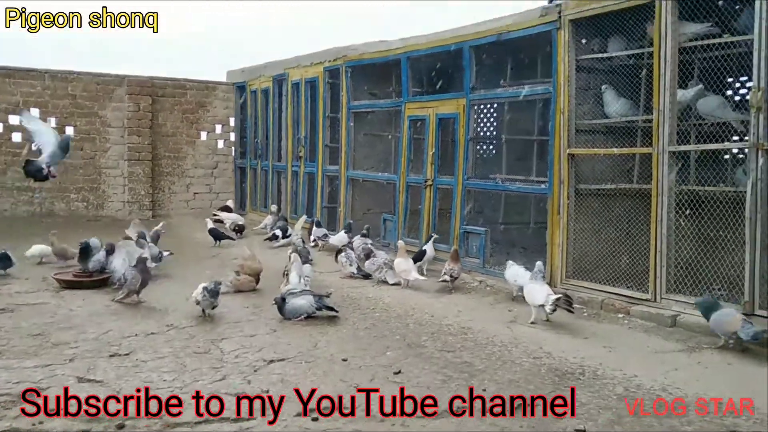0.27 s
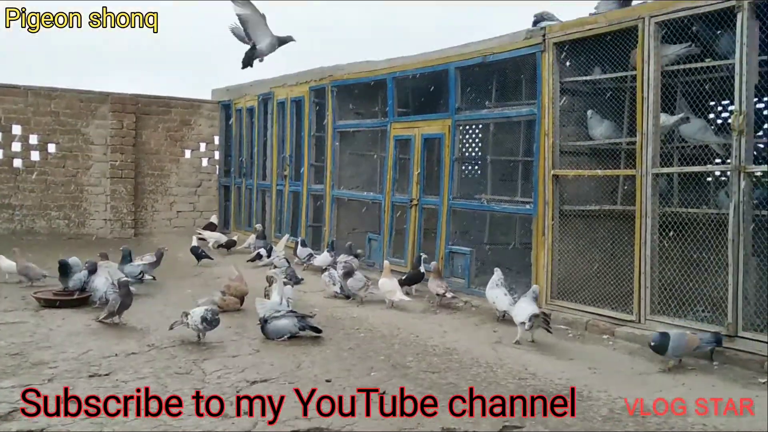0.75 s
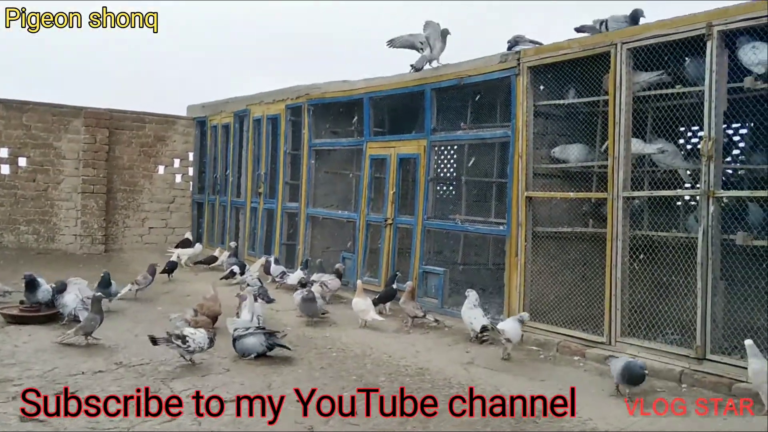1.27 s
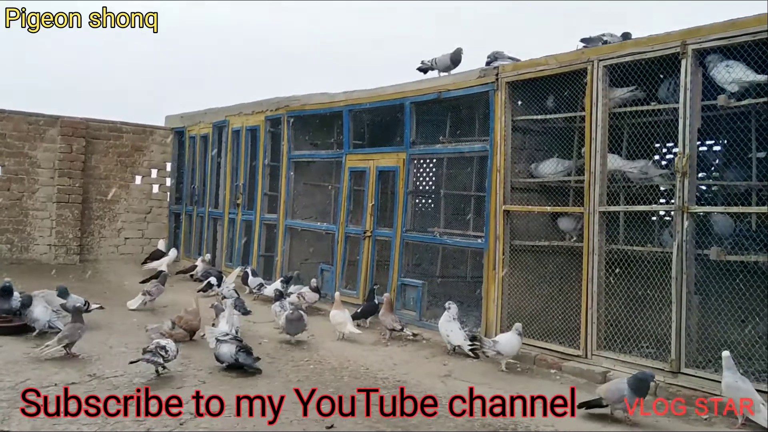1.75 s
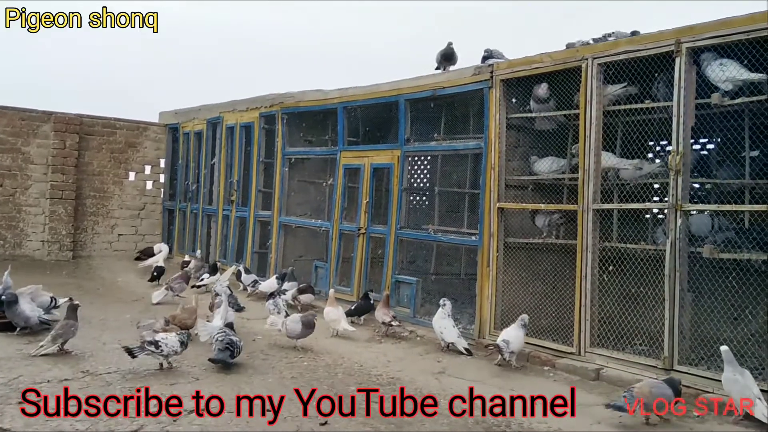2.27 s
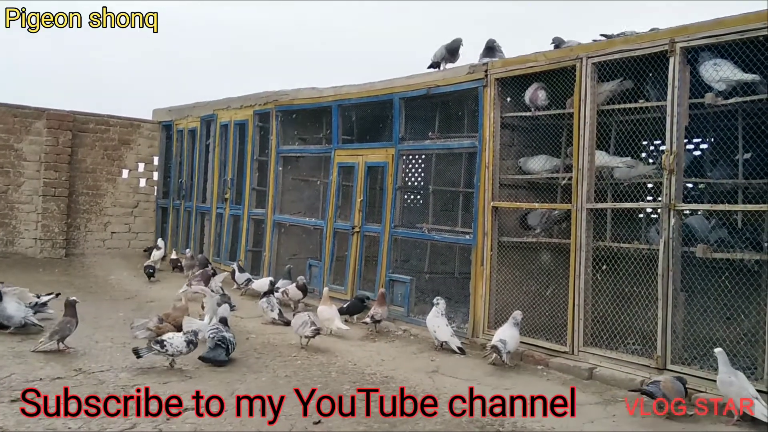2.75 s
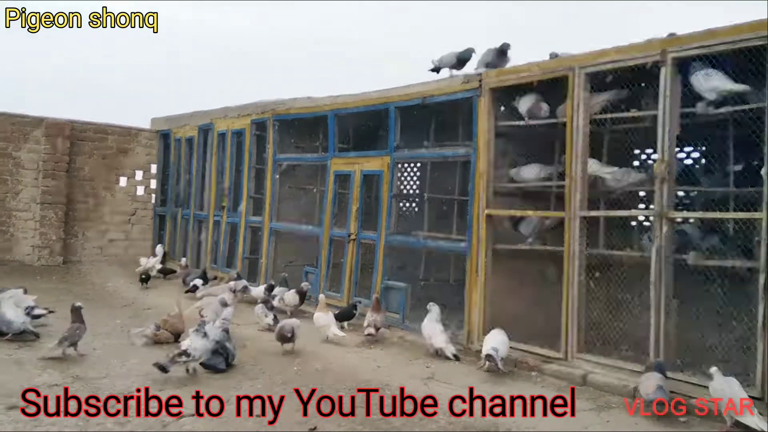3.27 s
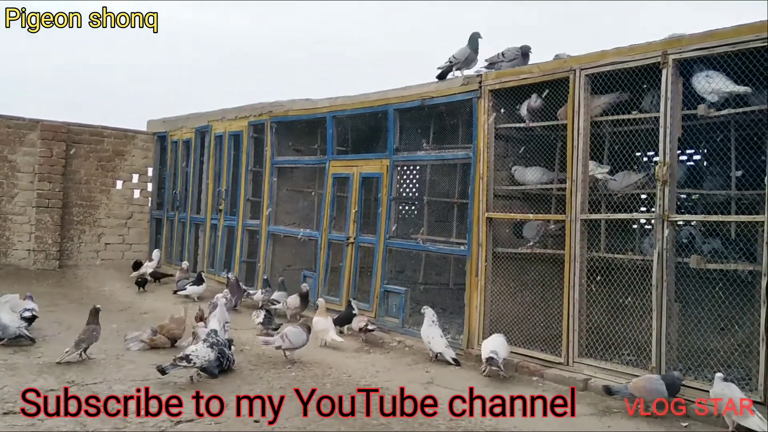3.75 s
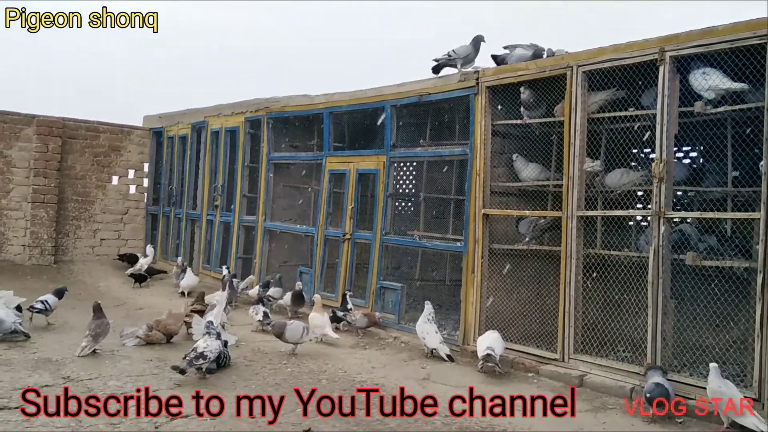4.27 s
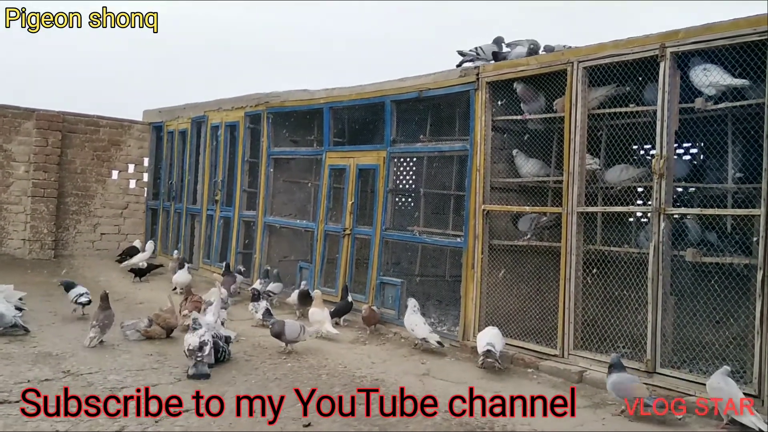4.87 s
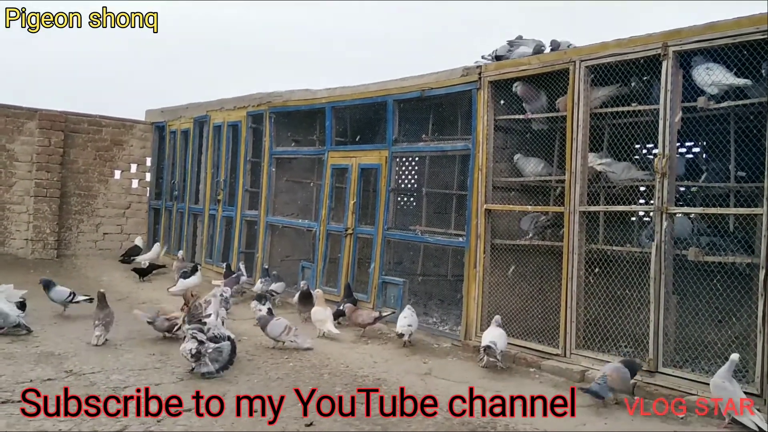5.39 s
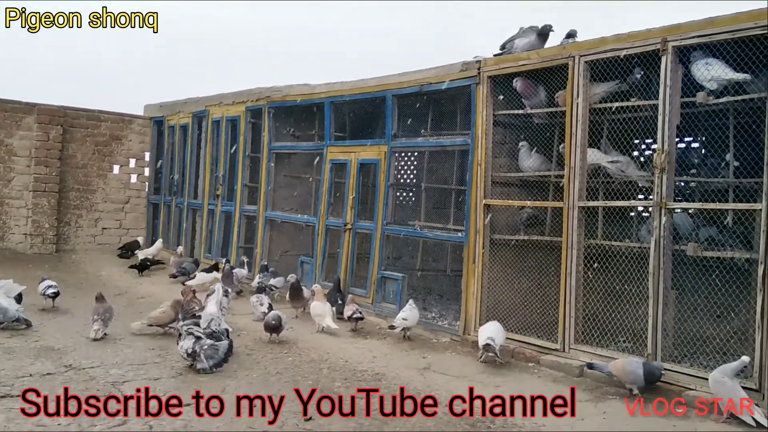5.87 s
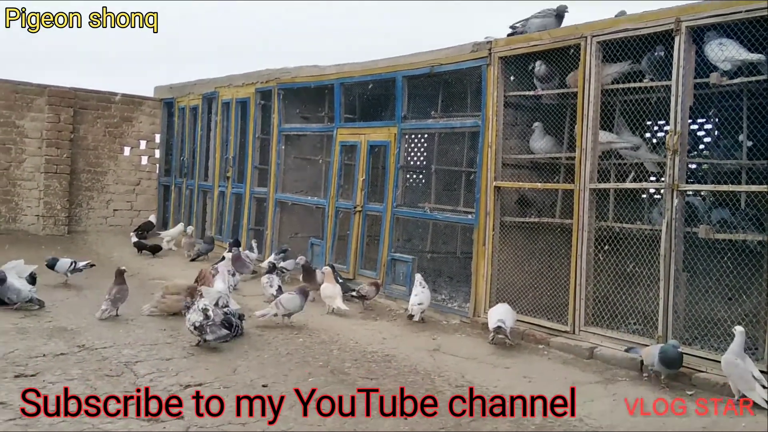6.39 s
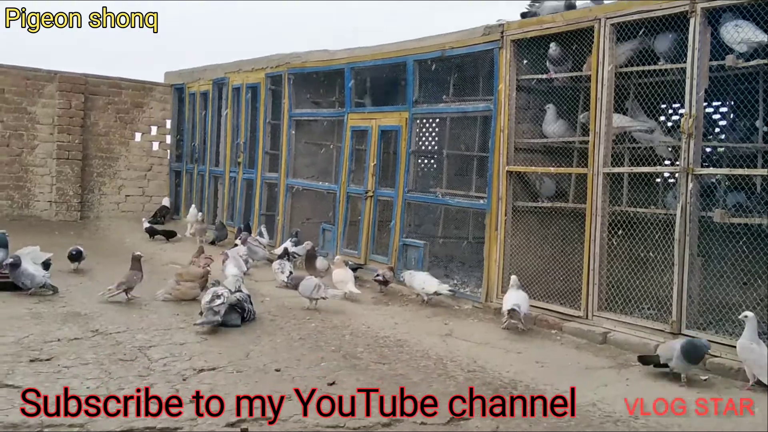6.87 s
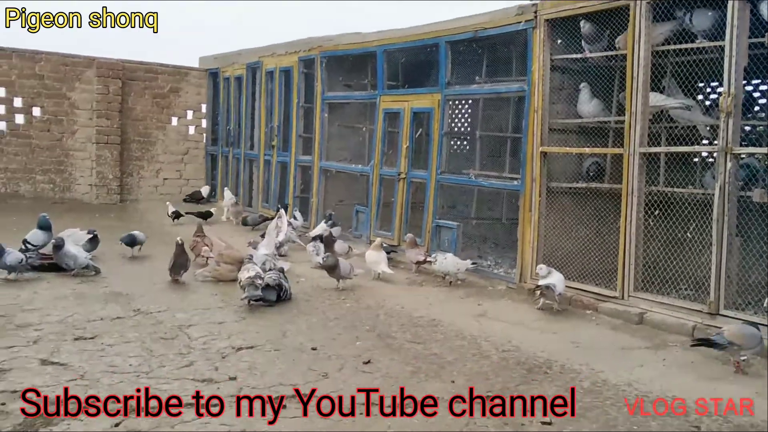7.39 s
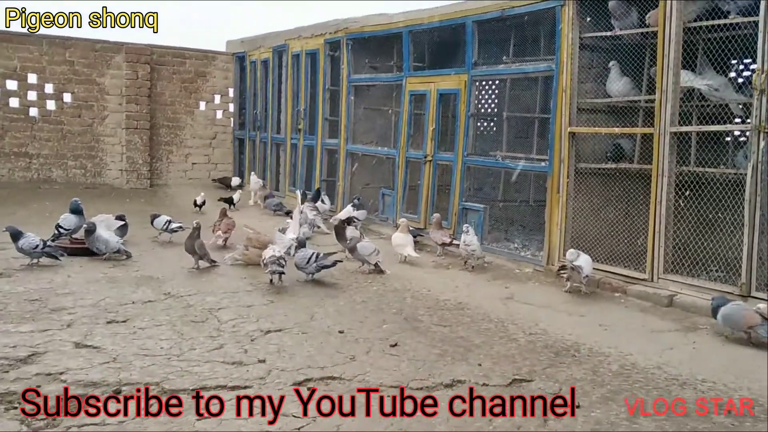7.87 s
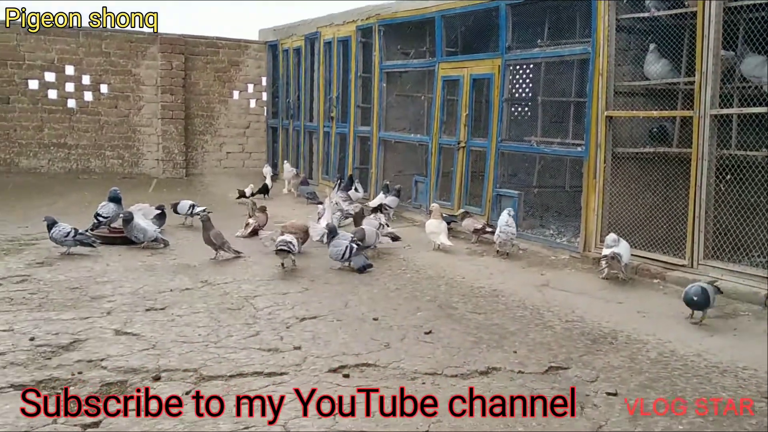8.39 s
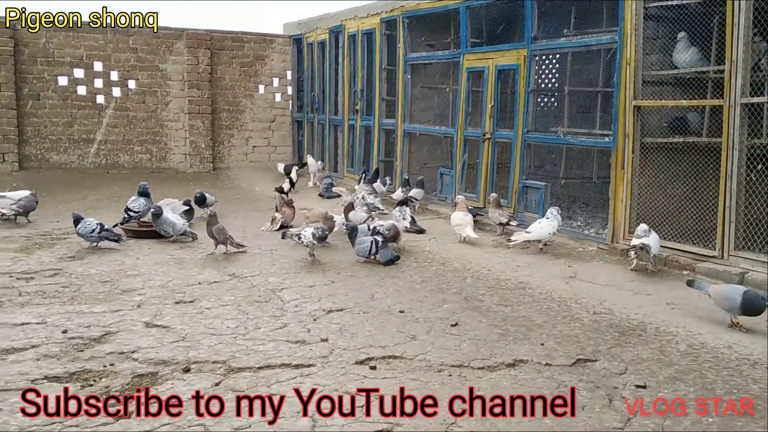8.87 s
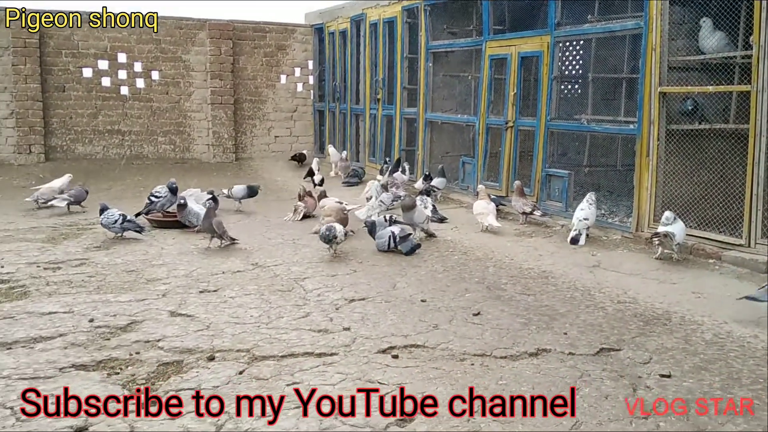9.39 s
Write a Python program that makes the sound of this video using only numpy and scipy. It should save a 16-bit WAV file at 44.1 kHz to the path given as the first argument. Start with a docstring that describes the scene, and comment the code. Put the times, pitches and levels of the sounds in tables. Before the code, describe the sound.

Dozens of pigeons murmur and roll low coos beside a wire-fronted loft, wings flapping now and then over thin hiss and light wind.

```python
"""A brick courtyard beside a pigeon loft, where a flock coos: overlapping syrinx tones rolled by flutter.
Near birds stand out of the chorus, with throbs and short high hoots; other notes are faint and distant.
Wings swish and clap in shaped noise, feathers rustle, beaks tick; the loft's wire front rattles once as modes.
Sparrows chirp far off, another bird cheeps, a thin trill wavers, and walls return sparse echoes.
A narrow hiss stays on the left, puffs of low wind noise hit the right microphone port, over outdoor air."""
import sys
import numpy as np
from scipy import signal
from scipy.fft import rfft, irfft, next_fast_len
from scipy.io import wavfile
from scipy.ndimage import uniform_filter1d

SR = 44100
rng = np.random.default_rng(int(sys.argv[2]) if len(sys.argv) > 2 else 0)


def generate_wav(signal):
    """Clip the signal to [-1, 1] and save it as 16-bit WAV at the path in sys.argv[1]."""
    frames = np.transpose(np.atleast_2d(signal))
    scaled = np.clip(frames, -1, 1) * 32767
    pcm = np.round(scaled).astype(np.int16)
    wavfile.write(sys.argv[1], SR, pcm)


N = 424683
TIME_S = np.arange(N) / SR
LAG_S = 0.00013  # left port after right


def gain_of(db):
    """Decibels to amplitude."""
    return 10 ** (np.asarray(db) / 20)


def evened(x):
    """Scales to rms 1."""
    return x / np.sqrt(np.mean(x ** 2) + 1e-20)


def read(points, hz):
    """A spectrum joined by straight lines over log frequency."""
    point_hz, value = np.transpose(points)
    return np.interp(np.log(hz + 1), np.log(point_hz + 1), value)


def level(rows):
    """A dB curve as a gain for every sample."""
    return gain_of(np.interp(TIME_S, *np.transpose(rows)))


def swells(rows, rise_s, fall_s):
    """Gain for every sample from events that rise, hold and fall; overlaps add in power."""
    power = np.zeros(N)
    for start_s, length_s, level_db in rows:
        rise = (TIME_S - start_s) / rise_s
        fall = (start_s + length_s - TIME_S) / fall_s
        power += (gain_of(level_db) * np.clip(np.minimum(rise, fall), 0, 1)) ** 2
    return np.sqrt(power)


def add(mix, start_s, sound):
    """Mixes a sound in at start_s, cut at the end of the mix."""
    part = mix[..., max(round(start_s * SR), 0):][..., :sound.shape[-1]]
    part += sound[..., :part.shape[-1]]


def coloured(x, colour, tilt_db=0):
    """Gives x a spectrum, tilted per octave, at rms 1."""
    size = next_fast_len(x.shape[-1])
    hz = np.fft.rfftfreq(size, 1 / SR)
    gain = gain_of(read(colour, hz) + tilt_db * np.log2(hz + 1))
    return evened(irfft(rfft(x, size) * gain, size)[..., :x.shape[-1]])


def wander(size, rate_hz):
    """Random drift of about unit size: straight lines between rate_hz random knots a second."""
    at = np.arange(size) * rate_hz / SR
    knots = rng.standard_normal(size // 100 + 4)
    return np.interp(at, np.arange(len(knots)), knots)


def noise():
    """White noise, independent at the two ports."""
    return rng.standard_normal((2, N))


def placed(x, left_db, lag_s=LAG_S):
    """Two ports: louder on the left by left_db, later on the left by lag_s."""
    at = np.arange(len(x))
    left = np.interp(at - lag_s * SR, at, x)
    return np.array([left * gain_of(left_db / 2), x * gain_of(-left_db / 2)])


# echo decay of the walls: frequency_hz, t60_s
WALL_DECAY = [(400,0.56),(10000,0.32)]


def yard(x, likeness):
    """Sparse wall echoes of random sign, each band dying at its own speed; likeness correlates the ports."""
    size, step = SR // 20, 20
    at = np.arange(size) * step + rng.integers(0, step, (2, size))
    taps = np.zeros((2, size * step))
    np.put_along_axis(taps, at, rng.choice([-1., 1.], (2, size)), 1)
    taps[:, :SR // 200] = 0  # no echo in the first 5 ms
    taps[1] = likeness * taps[0] + np.sqrt(1 - likeness ** 2) * taps[1]
    hz, t, bands = signal.stft(taps, SR, nperseg=256)
    decay = gain_of(-60 * t / read(WALL_DECAY, hz)[:, None])
    tail = signal.istft(bands * decay, SR)[1]
    return signal.fftconvolve(x, tail / np.linalg.norm(tail[0]), axes=1)[:, :N]


def syrinx(hz, rough, flutter_hz):
    """A nearly pure tone, pitch and strength rolled by an uneven flutter; returns strength and phase."""
    size = len(hz)
    flutter = np.cumsum(flutter_hz * (1 + 0.3045 * wander(size, 29.6))) / SR
    roll = np.sin(2 * np.pi * (flutter + rng.random()))
    shaken_hz = hz * (1 + rough * (0.1 * roll + 0.0611 * wander(size, 90.33)))
    phase = 2 * np.pi * (np.cumsum(shaken_hz) / SR + rng.random())
    return (1 + rough * roll) / np.sqrt(1 + rough ** 2 / 2), phase


def notes(rows, length_s, glide, rough, flutter_hz, gain_db):
    """Short calls that swell quickly, glide by a share of their pitch and fade."""
    out, u = np.zeros(N), np.linspace(0, 1, int(length_s * SR))
    swell = np.sin(np.pi * u ** 0.6) ** 2
    for time_s, level_db, pitch_hz in rows:
        strength, phase = syrinx(pitch_hz * (1 + glide * (u - .4)), rough, flutter_hz)
        call = gain_of(level_db + gain_db) * swell * strength * np.sin(phase)
        add(out, time_s - length_s / 10, call)
    return out


# outdoor background spectrum: frequency_hz, relative_db_per_hz
AIR_COLOUR = [(20,-13.5),(130,12.5),(300,16.5),(700,3.5),(1500,1),(3600,-4),(7200,9),(10500,-8.5),(14000,-13)]


def air():
    """Steady outdoor background as shaped noise."""
    return gain_of(-57.5) * coloured(noise(), AIR_COLOUR)


# hiss before port gains: time_s, level_db
HISS_LEVEL = [(0,-41),(4,-42),(6.6,-44),(7.9,-41),(9.63,-44)]
# hiss spectrum: frequency_hz, relative_db_per_hz
HISS_BAND = [(2000,-28.5),(2950,-19.5),(3500,-39),(5470,-33),(5660,-10),(6400,2),(7400,8.5),(8100,3),(8500,-25.5),(10000,-40),(12400,-26.5),(14000,-49)]


def hiss(left_db=6, right_db=-22, flicker_db=1.35, grain_db=2.09):
    """A narrow band of high, grainy hiss, combed by the echo from a nearby wall."""
    grain = gain_of(flicker_db * wander(N, 22) + grain_db * wander(N, 260))
    grainy = coloured(noise(), HISS_BAND) * grain
    combed = grainy + .3 * np.roll(grainy, round(.00433 * SR), axis=1)
    return evened(combed) * level(HISS_LEVEL) * gain_of([[left_db], [right_db]])


# wind spectrum: frequency_hz, relative_db_per_hz
WIND_BAND = [(20,-60.5),(40,-37.5),(65,-1),(150,-1.5),(260,-6.5),(400,-27.5),(800,-71.5)]
# gusts before gain: start_s, length_s, level_db
WIND_GUSTS = [(.2,0.4,-42),(.9,0.31,-47),(2.12,0.21,-47.5),(3.22,0.834,-38),(4.48,0.58,-32.5),(5,1.024,-40.5),(7.62,3.3,-41.5),(7.9,0.76,-35),(9.25,0.37,-29.5)]
# single buffets of wind: start_s, peak_gain_db
WIND_BUFFETS = [(0.912, -27), (5.628, -16.5), (8.171, -20), (8.265, -21.5), (8.487, -18.5), (8.872, -26),
                (9.567, -13)]


def wind(buffet_s=0.011, calm_db=-72, gain_db=-2, lumpy_db=3):
    """Lumpy low turbulence, nearly all on the right port."""
    gusts = gain_of(calm_db) + swells(WIND_GUSTS, rise_s=0.054, fall_s=0.083)
    push = gusts * gain_of(gain_db + lumpy_db * wander(N, 25))
    u = np.arange(SR // 5) / SR / buffet_s
    for start_s, peak_db in WIND_BUFFETS:
        add(push, start_s, gain_of(peak_db) * u * np.exp(1 - u))
    return push * coloured(noise(), WIND_BAND) * gain_of([[-25], [0]])


def whine(whine_hz=3150, whine_db=-63, jitter=.016, drift_db=3):
    """A faint, thin trill, perhaps an insect, that wavers and comes and goes."""
    pulses = np.maximum(wander(N, 45) + 0.76, 0)
    strength = evened(pulses * gain_of(drift_db * wander(N, 5)))
    phase = 2 * np.pi * np.cumsum(whine_hz * (1 + jitter * wander(N, 400))) / SR
    return gain_of(whine_db) * strength * np.sin(phase) * gain_of([[0], [-18]])


# thin high cheeps of another bird: time_s
CHEEP_TIMES = [.03,.15,.52,.85,.98,1.39,1.62,3.04,3.37,5.93]


def cheeps(cheep_hz=5120, cheep_db=-69):
    """A distant bird repeats one thin, trembling note."""
    rows = [(time_s, cheep_db, cheep_hz) for time_s in CHEEP_TIMES]
    return notes(rows, length_s=0.061, glide=0, rough=.05, flutter_hz=60, gain_db=-2.0)


# clear sparrow chirps, before placing: start_s, level_db, pitch_hz
CLEAR_CHIRPS = [(.03,-61.5,3200),(.653,-59.5,3390),(.848,-66,2780),(.988,-65,2590),(1.097,-59.5,4640),(1.263,-62.5,3240),(1.447,-64.5,4300),
                (1.76,-56,2940),(2.04,-60,5050),(2.93,-66.5,3710),(3.05,-60,3540),(3.508,-61.5,3080),
                (4.421,-60,3660),(4.738,-63,4970),(4.8,-63.5,3025),(5.256,-61,3680),(6.82,-65.5,3020),
                (7.3,-62.5,4400),(7.718,-63,3010),(7.72,-63.5,4530),(7.824,-65,3340),(8.576,-57.5,3160)]


def sparrows(count=50, far_db=-72.5, weaker_db=-7, length_s=0.033, glide=0.068, rasp=.014, ragged_db=3,
             apart=.1):
    """Each syrinx side sings its own raspy, sliding tone; clear chirps stand over farther chatter."""
    out, u = np.zeros(N), np.linspace(0, 1, int(length_s * SR))
    far = [(s * N / SR, far_db, 2900 * 2 ** octave) for s, octave in rng.random((count, 2))]
    for start_s, level_db, pitch_hz in list(CLEAR_CHIRPS) + far:
        second_hz = pitch_hz * (1 + rng.choice([-apart, apart]))
        for hz, voice_db in ((pitch_hz, 0), (second_hz, weaker_db)):
            slide = glide * rng.uniform(-1.0, 1) * (u - .5)
            tone_hz = hz * (1 + slide + rasp * wander(len(u), 400))
            ragged = gain_of(level_db + voice_db + ragged_db * wander(len(u), 250))
            swell = ragged * np.sin(np.pi * u ** .65) ** 2
            add(out, start_s, swell * np.sin(2 * np.pi * np.cumsum(tone_hz) / SR))
    return out


# faint, distant bird notes, before gain: time_s, level_db, pitch_hz
DISTANT_NOTES = [(2.13,-67.5,802),(3.27,-73,1680),(4.335,-72,1650),(5.02,-69.5,1465),(7.02,-61,737),(7.67,-62.5,794)]


def peeps():
    """Faint distant birds give fluttering notes of steady mean pitch."""
    return notes(DISTANT_NOTES, length_s=0.086, glide=0, rough=0.4, flutter_hz=38.7, gain_db=13.0)


# close beak taps, before placing: start_s, level_db
CLOSE_PECKS = [(4.495,-37),(7.5032,-37.5)]


def pecks(ring_hz=7200, decay_s=0.0012, count=60, far_db=-49):
    """Tiny bright ticks of beaks on the ground: a few close ones among many farther off."""
    out, t = np.zeros(N), np.arange(SR // 100) / SR
    ticks = [(start_s, level_db, ring_hz) for start_s, level_db in CLOSE_PECKS]
    for s, away, pitch in rng.random((count, 3)):
        ticks.append((s * N / SR, far_db - 10 * away, ring_hz * 2 ** ((pitch - .5) / 2)))
    envelope = t / decay_s * np.exp(1 - t / decay_s)
    for start_s, level_db, hz in ticks:
        add(out, start_s, gain_of(level_db) * np.sin(2 * np.pi * hz * t) * envelope)
    return out


def struck(blows, modes, t60_s, rise_s, shake_hz, ragged_db=3):
    """Each blow rings a loose part's modes, low ones longest; rattling shakes pitch and roughens the fade."""
    out, t = np.zeros(N), np.arange(SR // 2) / SR
    lowest_hz = modes[0][0]  # t60_s is that of the lowest mode
    for start_s, blow_db in blows:
        for mode_hz, mode_db in modes:
            decay = np.exp(-np.log(1000) * t / t60_s * np.sqrt(mode_hz / lowest_hz))
            envelope = np.minimum(t / rise_s, 1) * decay
            turns = np.cumsum(mode_hz + shake_hz * wander(len(t), 400)) / SR + rng.random()
            gain = gain_of(blow_db + mode_db + ragged_db * wander(len(t), 200))
            add(out, start_s, gain * envelope * np.sin(2 * np.pi * turns))
    return out


# knocks, probably feet on the wire front: start_s, relative_db
WIRE_KNOCKS = [(4.456,-41),(4.494,-57),(4.507,-49)]
# modes of the wire: frequency_hz, relative_db
WIRE_MODES = [(1265,-15),(1700,-18),(2250,-10),(2900,-5.5),(3030,0),(3550,-7),(4270,-2),(5020,0.5),(5660,4),(6600,9),(7800,7),(8760,-2)]
# birds striking a perch as they land and clap their wings: start_s, relative_db
PERCH_LANDINGS = [(7.567,-55.5),(9.028,-51)]
# modes of the perch: frequency_hz, relative_db
PERCH_MODES = [(900,-6),(1150,-2),(1690,-8.5),(2690,4),(4520,5),(4860,11)]


def loft():
    """The wire front rattles and a perch rings, echoed by the walls."""
    wire = struck(WIRE_KNOCKS, WIRE_MODES, t60_s=.19, rise_s=.0025, shake_hz=170)
    perch = struck(PERCH_LANDINGS, PERCH_MODES, t60_s=0.23, rise_s=.0068, shake_hz=45)
    rings = placed(wire + perch, left_db=11.5)
    return rings + gain_of(-6.0) * yard(rings, likeness=.2)


# stretches of thin, feathery rustle: start_s, length_s, level_db
RUSTLE_STRETCHES = [(.2,0.45,-65),(7.55,2.5,-58.5)]
# rustle spectrum: frequency_hz, relative_db_per_hz
RUSTLE_BAND = [(4000,-43),(8500,-12.5),(11000,2.5),(12500,-7),(14300,-25.5)]


def rustle(rise_s=0.081, fall_s=0.063, patchy_db=4, grain_db=4.0, right_db=-5):
    """Feathers shuffle in uneven patches of fine grain."""
    grain = gain_of(patchy_db * wander(N, 14) + grain_db * wander(N, 260))
    feathers = coloured(noise() * grain, RUSTLE_BAND)
    return swells(RUSTLE_STRETCHES, rise_s, fall_s) * feathers * gain_of([[0], [right_db]])


# wing swishes and claps, before port gains: start_s, level_db, t60_s, tilt_db_per_octave
WING_STROKES = [(.01,-41.5,0.63,10),(1.91,-40,0.14,8),(2.1,-42.5,0.29,-1),(2.511,-44.5,0.18,3.5),(5.787,-34,0.23,-2.5),(7.1,-39.5,0.14,4),(7.565,-27,0.31,6),(7.816,-38,0.44,5.5),(8.041,-39,0.31,1),(9.019,-24,.29,1)]
# stroke spectrum before tilt: frequency_hz, relative_db_per_hz
WING_COLOUR = [(1000,-32),(4500,-28.5),(5700,-3),(7200,1.5),(9000,-7),(11000,-17),(14300,-26.5)]


def wings(rise_s=0.0029, grain_db=2.0, snaps_per_s=800, snap_db=-4.5, ripple_db=4.0):
    """Feathers brush and snap past each other in a crackling burst; each stroke has its own uneven colour."""
    out, t = np.zeros((2, N)), np.arange(SR) / SR
    hardest_db = max(row[1] for row in WING_STROKES)
    for start_s, level_db, t60_s, tilt_db in WING_STROKES:
        snaps = evened((rng.random(SR) < snaps_per_s / SR) * rng.uniform(-1, 1, SR))
        brush = rng.standard_normal((2, SR)) * gain_of(grain_db * wander(SR, 140))
        spectrum = rfft(brush + gain_of(snap_db) * snaps)
        ripple = gain_of(ripple_db * wander(spectrum.shape[1], 300))  # drifts along frequency
        stroke = coloured(irfft(spectrum * ripple, SR), WING_COLOUR, tilt_db)
        stroke_rise_s = rise_s * gain_of(0.66 * (hardest_db - level_db))  # gentle strokes start slowly
        envelope = np.minimum(t / stroke_rise_s, 1) * np.exp(-np.log(1000) * t / t60_s)
        add(out, start_s, stroke * envelope * gain_of(level_db + np.array([[2], [-6]])))
    return out


# short high hoots, before gain: time_s, level_db, pitch_hz
HIGH_HOOTS = [(0.366, -42.5, 633), (0.531, -41, 637), (1.338, -36.5, 590), (1.52, -37.5, 623),
              (1.667, -37.5, 625), (5.397, -35.5, 644), (7.307, -39.5, 599), (8.119, -32.5, 627),
              (8.413, -31, 630)]


def hoots():
    """One bird gives short high syrinx notes with a slight upward glide."""
    return notes(HIGH_HOOTS, length_s=0.039, glide=0.014, rough=0.36, flutter_hz=30.5, gain_db=-1.5)


def steadied(x):
    """Evens out the slow swells of a crowd, keeping its flutter."""
    power = uniform_filter1d((x ** 2).mean(0), size=4000)
    return x / np.sqrt(power + 1e-4 * np.mean(x ** 2))


# how busy the rest of the flock is: time_s, level_db
FLOCK_LEVEL = [(0,-27),(.75,-27),(1.55,-33.5),(1.8,-28.5),(2.72,-29),(3.0,-23.5),(3.2,-31),(3.9,-26.5),(4.88,-29),(5.27,-46.5),(5.48,-31),(6.06,-22.5),(6.42,-30),(7.3,-30.5),(8.0,-26.5),(8.25,-34),(9.1,-26.5),(9.63,-31.5)]
# what the crop lets through: frequency_hz, relative_db
CROP_COLOUR = [(300,-10),(420,0),(480,1),(525,-4),(580,-12),(650,-22),(750,-44),(1200,-75)]
# bouts of harder pressing, overtones standing out; before overtone_db: start_s, length_s, level_db
PRESSED_BOUTS = [(0,0.85,-41),(1.3,0.55,-45),(1.86,0.45,-40),(2.3,0.85,-37),(3.24,0.99,-37.5),(4.25,0.57,-43),(5.42,0.44,-40),(5.76,.64,-38),(6.74,0.407,-39.5),(7.68,.45,-45),(8.87,0.35,-38)]


def flock(count=130, low_hz=203, high_hz=390, rough=0.5, overtone_db=-1.0, calm_db=-19.5, near_db=5,
          growl=0.29):
    """Many rolling coos overlap, each an arch of pitch from its own place in the yard."""
    coos, overtones = np.zeros((2, 2, N + SR))
    for k, (start, length, pitch, flutter, side, near) in enumerate(rng.random((count, 6))):
        u = np.linspace(0, 1, int((1 + length) * SR / 5))
        arch = np.sin(np.pi * u)
        register = (k % 3 + pitch) / 3  # deep, middle and high voices mingle
        hz = (low_hz + (high_hz - low_hz) * register) * (.86 + .2 * arch)
        strength, phase = syrinx(hz, rough, 18 * (1 + flutter))
        strength = strength * arch * gain_of(near_db * near)
        strength = strength * (1 + growl * (1 - register) * wander(len(u), 200))  # deep voices rasp most
        start_s = (k + start) / count * (N / SR + .5)
        left_db = 2.0 + 7 * (side - .5)
        lag_s = LAG_S + 0.00065 * (.5 - side)
        add(coos, start_s, placed(strength * np.sin(phase), left_db, lag_s))
        add(overtones, start_s, placed(strength * np.sin(2 * phase), left_db, lag_s))
    # drop the first half second, where the chorus builds up
    coos, overtones = (x[:, SR // 2:][:, :N] for x in (coos, overtones))
    coos = steadied(coos + 0.29 * yard(coos, likeness=0.71))
    overtones = overtones + 0.53 * yard(overtones, likeness=0.069)
    overtones = steadied(coloured(overtones, CROP_COLOUR))
    busy = level(FLOCK_LEVEL)
    pressed = np.hypot(gain_of(calm_db) * busy, swells(PRESSED_BOUTS, rise_s=0.036, fall_s=0.1))
    return busy * coos + gain_of(overtone_db) * pressed * overtones


# short throbs that open or accent a coo, before gain: time_s, level_db, pitch_hz
COO_THROBS = [(.849,-22.5,262),(1.233,-22.5,305),(2.557,-19,263.5),(2.809,-18,315),(3.954,-22.5,325),(5.685,-22.5,286),(6.073,-19,289),(7.743,-18.5,328)]


def throbs():
    """Brief falling syrinx notes, rolled by flutter."""
    return notes(COO_THROBS, length_s=0.0326, glide=-0.14, rough=0.5, flutter_hz=40.3, gain_db=5.5)


# coos of the near birds, before placing: start_s, length_s, pitch_hz, glide_share, level_db, roughness_0_to_1
NEAR_COOS = [(.279,.33,252.1,0.049,-24.5,0.31),(.42,0.21,324.3,-0.14,-26.5,0.41),(.66,0.24,290,-0.25,-24,0.47),(.72,0.34,232.7,-0.072,-27,0.45),(.88,.16,340.5,-0.087,-27,0.25),(1.063,0.18,410,-0.16,-27.5,0.19),
             (1.365,0.21,323.6,0.088,-30.5,0.26),(1.636,0.22,285.8,-0.23,-24.5,0.53),(1.728,.14,353,-0.18,-27.5,0),(2.233,0.28,239.5,0.19,-28.5,0.12),(2.42,0.21,350,0,-32,0.28),
             (2.601,.3,290,.18,-24,0.66),(2.782,0.27,354.5,0,-19,0.48),(2.84,.27,234,-.08,-22.5,0.3),(2.99,0.1,270.2,-0.14,-18.5,.3),(3.157,.15,335,-0.065,-24.5,0.33),
             (3.264,0.27,282.5,-0.065,-26.5,0.1),(3.66,0.21,462,-.14,-33.5,.1),(3.748,0.15,307.2,-0.36,-20.5,0.17),(3.99,0.08,550,-.03,-33,0.12),(3.997,.18,352,0.008,-22,0.23),(4.3,.22,340.3,-0.19,-19.5,0.4),
             (4.491,0.085,275.4,-0.13,-18.5,0.36),(4.649,0.3,286,-.15,-27,0.17),(4.66,.4,373.6,-0.034,-32,0.41),(4.898,0.31,229.7,-0.14,-29,0.24),(5.283,0.17,272,0.23,-26.5,0.08),
             (5.8,0.22,247.7,0.13,-25,0.42),(5.901,.2,335.6,-0.14,-22,.6),(5.96,.12,389.6,-0.15,-21.5,0.64),(6.091,.206,217.7,-0.12,-28.5,0.32),(6.49,0.21,234.9,0.13,-27,0.17),
             (6.661,.45,293.3,0.12,-27,0.54),(6.739,0.27,380.8,.024,-27,0.44),(7.117,0.12,347.2,-0.015,-26.5,0.24),(7.21,0.19,393,0.011,-28,0.24),
             (7.231,0.18,275.3,0.19,-19,.05),(7.469,0.16,291.3,-0.14,-21,0.37),(7.737,.29,344.1,-0.04,-19.5,0.31),(7.98,.14,373,-0.061,-27.5,0.17),(8.001,.13,268,0.027,-20,0.06),
             (8.11,0.24,275.9,-0.102,-25.5,0.24),(8.34,0.27,282.5,-0.079,-28,0.37),(9.15,0.14,338,-0.012,-24.5,0.08),(9.18,0.15,271.8,-0.21,-22.5,.35)]


def near_coos(flutter_hz=33, swell_db=6, overtone_db=-46, climax=0.57, arch=0.027):
    """Coos glide, swell and arch in pitch to a climax; the swollen crop passes hardly any overtone."""
    out = np.zeros(N)
    for start_s, length_s, pitch_hz, glide, level_db, rough in NEAR_COOS:
        u = np.linspace(0, 1, int(length_s * SR))
        effort = np.interp(u, [0, climax, 1], [0, 1, 0])
        hz = pitch_hz * (1 + glide * (u - .5) + arch * (effort - .5))
        strength, phase = syrinx(hz, rough, flutter_hz)
        swell = gain_of(level_db - swell_db * (1 - effort)) * signal.windows.tukey(len(u), .2)
        tone = np.sin(phase) + gain_of(overtone_db) * np.sin(2 * phase)
        add(out, start_s, swell * strength * tone)
    return out


def scene():
    """Birds and their echoes in the yard, with hiss, air and wind."""
    background = air() + hiss() + wind() + whine()
    small = placed(cheeps() + sparrows() + pecks(), left_db=37.0)
    small = small + gain_of(-3.5) * yard(small, likeness=.2)
    high = placed(peeps(), left_db=1.0) + placed(hoots(), left_db=6.0)
    high = high + gain_of(-7.0) * yard(high, likeness=0.98)
    near = placed(throbs() + near_coos(), left_db=2.5)
    near = near + gain_of(-6.5) * yard(near, likeness=0.98)
    return background + small + loft() + rustle() + wings() + high + flock() + near


def record(dry, edge_hz=14350):
    """The recorder's band limit: a linear-phase low-pass."""
    low_pass = signal.firwin(511, edge_hz, window=("kaiser", 9), fs=SR)
    return signal.oaconvolve(dry, low_pass[None], "same")


dry = scene()
out = record(dry)
generate_wav(out)
```